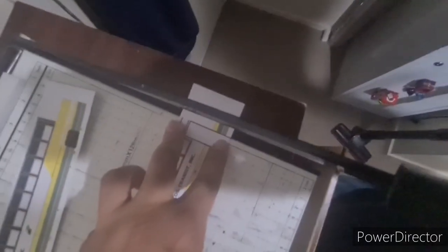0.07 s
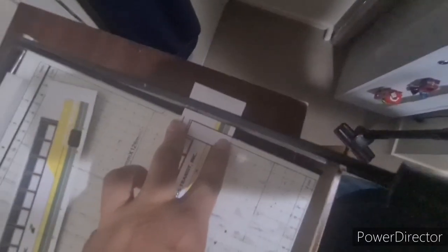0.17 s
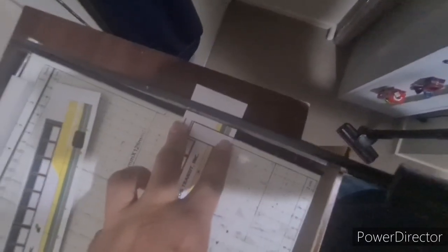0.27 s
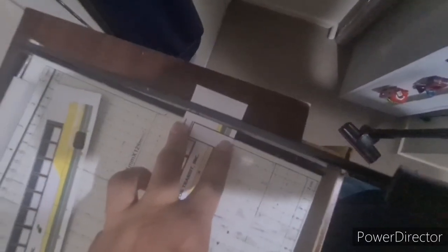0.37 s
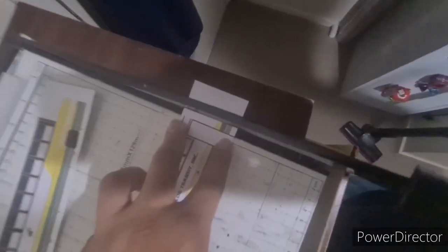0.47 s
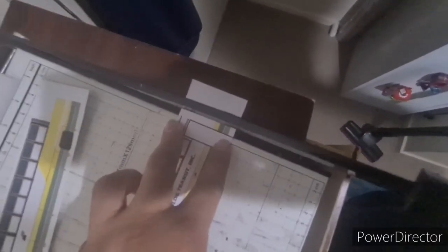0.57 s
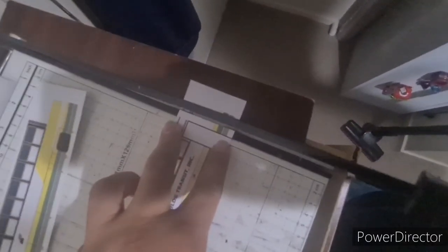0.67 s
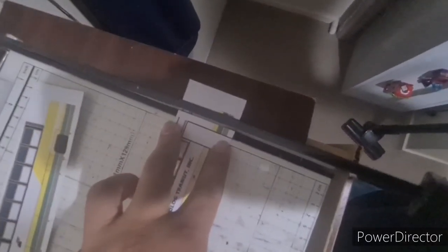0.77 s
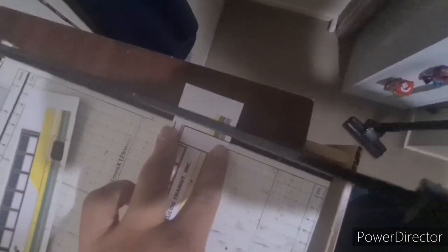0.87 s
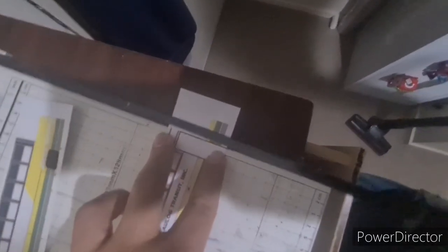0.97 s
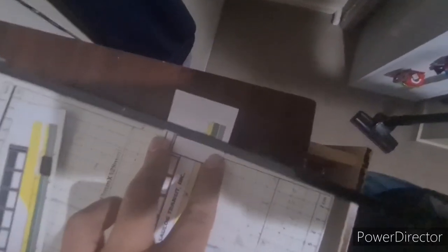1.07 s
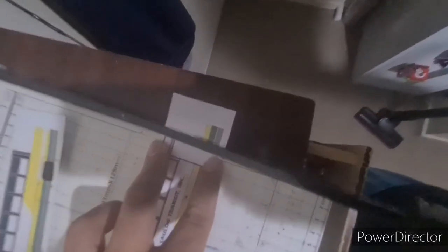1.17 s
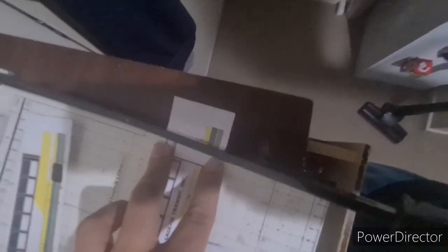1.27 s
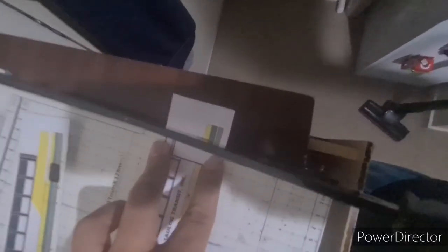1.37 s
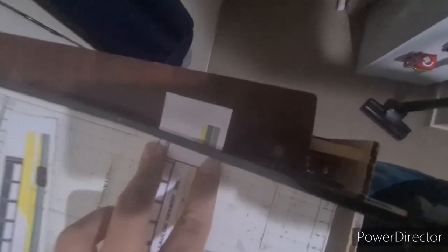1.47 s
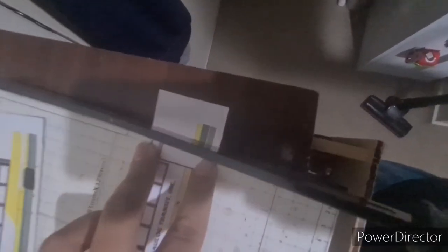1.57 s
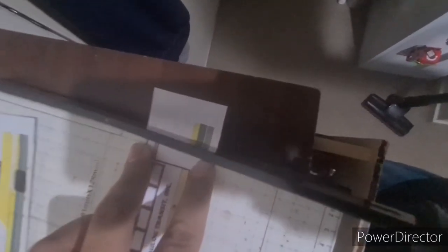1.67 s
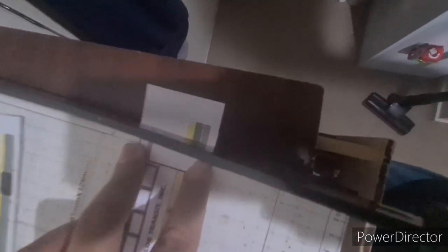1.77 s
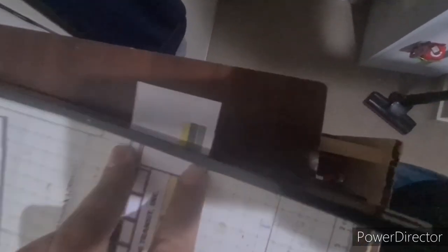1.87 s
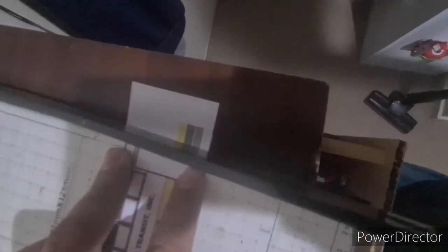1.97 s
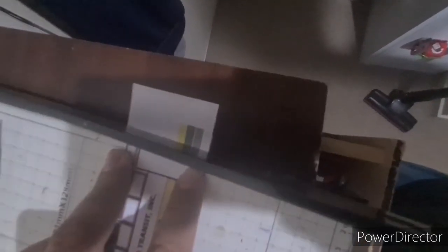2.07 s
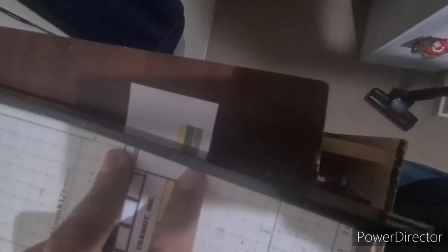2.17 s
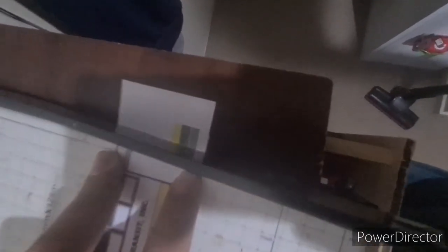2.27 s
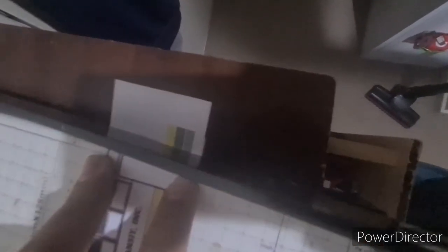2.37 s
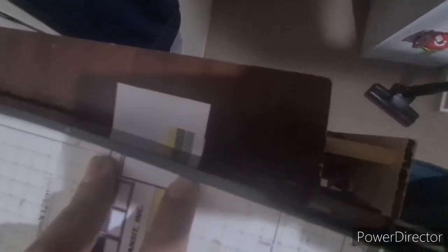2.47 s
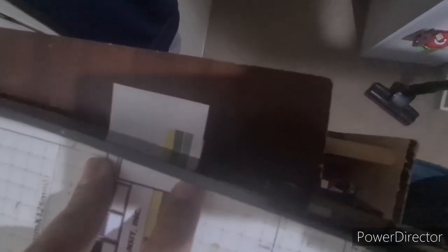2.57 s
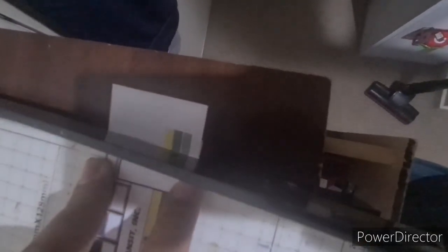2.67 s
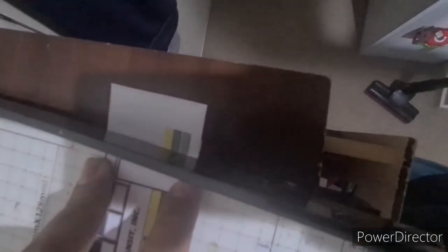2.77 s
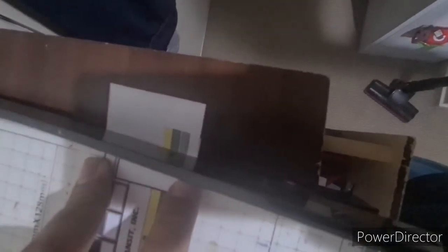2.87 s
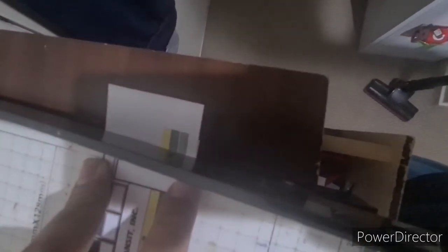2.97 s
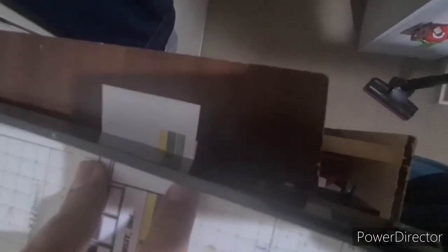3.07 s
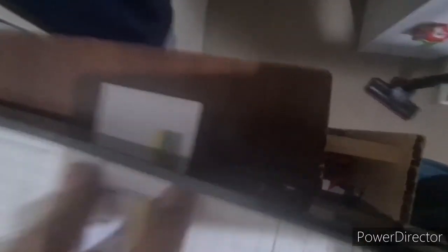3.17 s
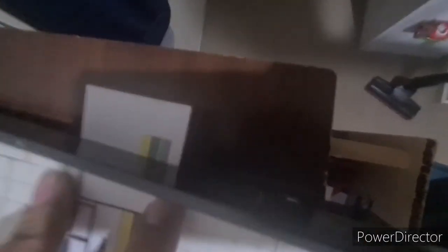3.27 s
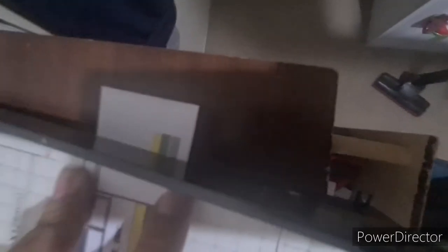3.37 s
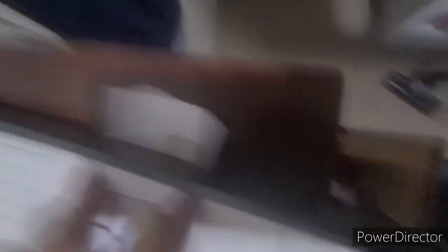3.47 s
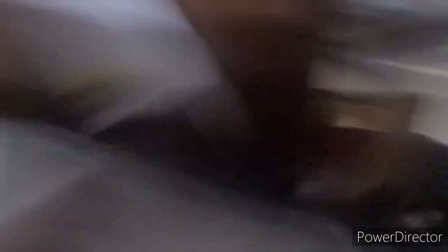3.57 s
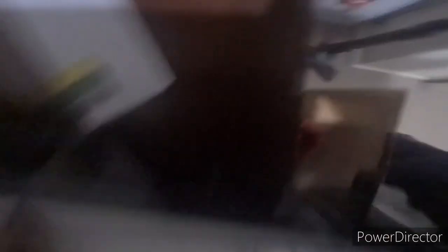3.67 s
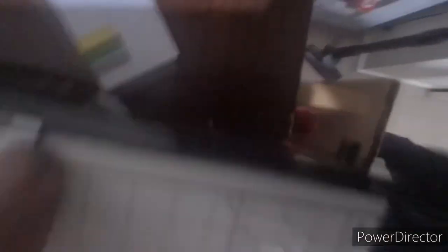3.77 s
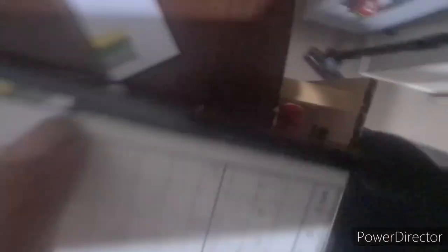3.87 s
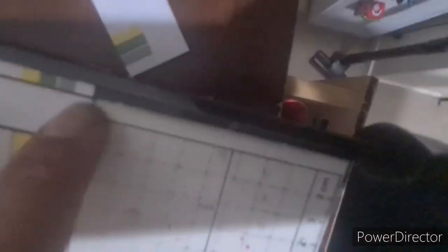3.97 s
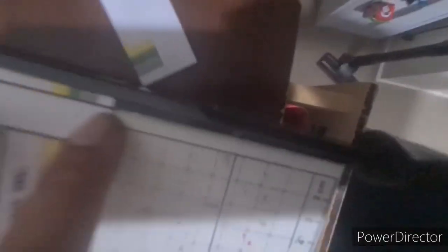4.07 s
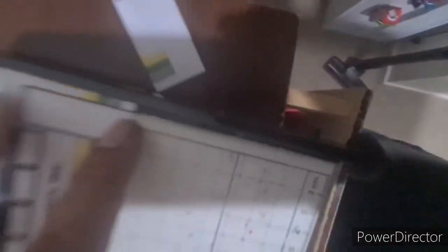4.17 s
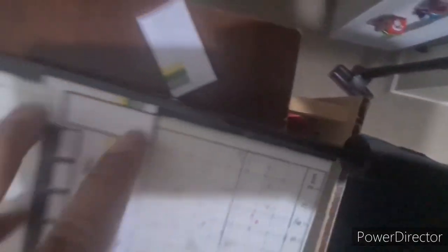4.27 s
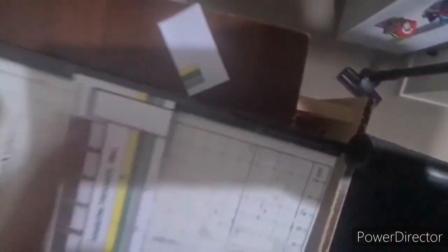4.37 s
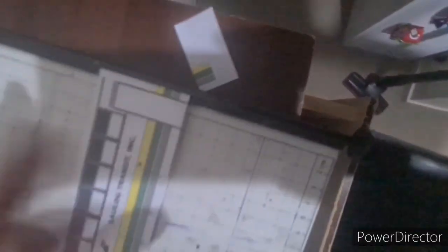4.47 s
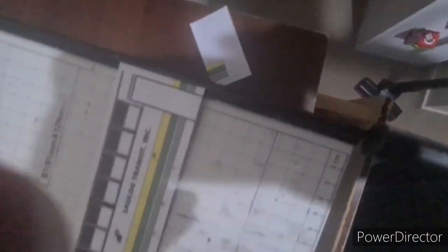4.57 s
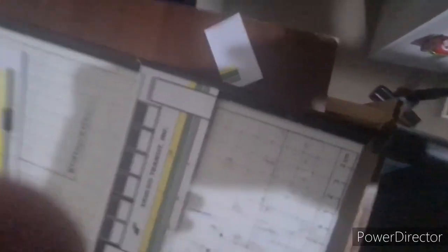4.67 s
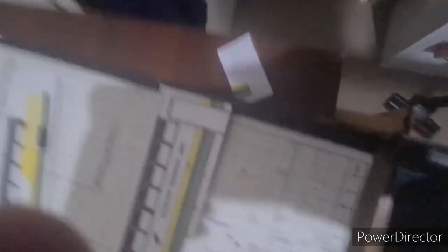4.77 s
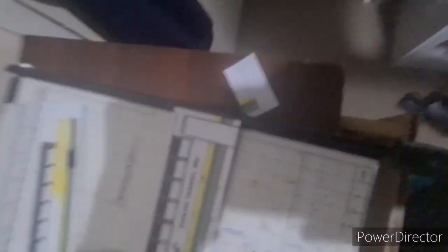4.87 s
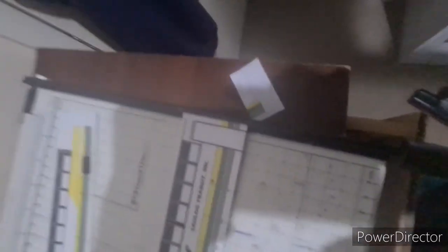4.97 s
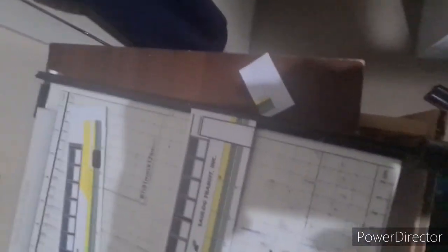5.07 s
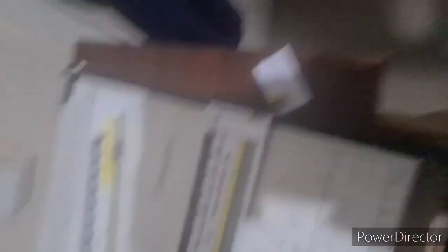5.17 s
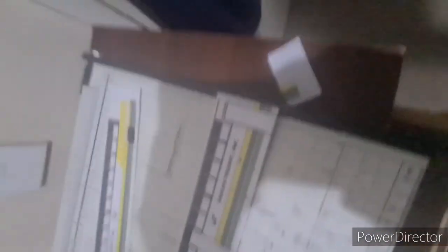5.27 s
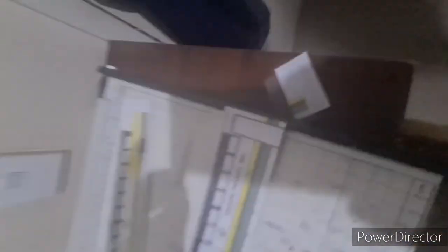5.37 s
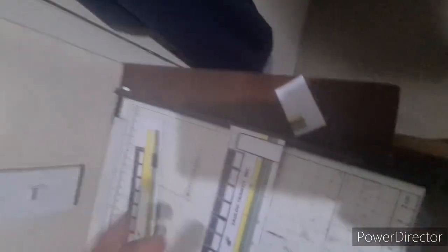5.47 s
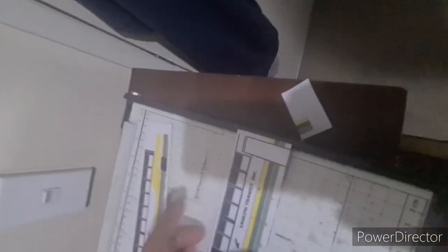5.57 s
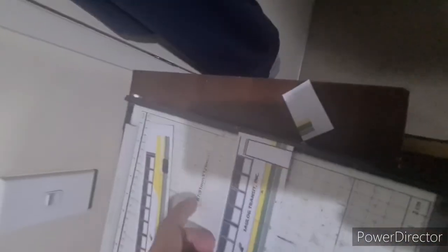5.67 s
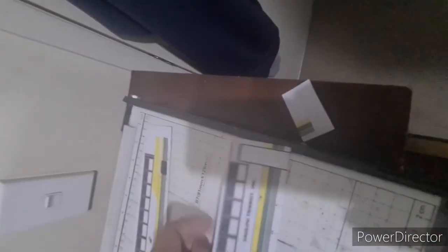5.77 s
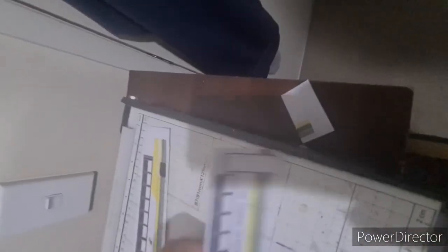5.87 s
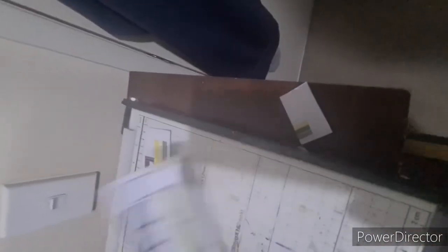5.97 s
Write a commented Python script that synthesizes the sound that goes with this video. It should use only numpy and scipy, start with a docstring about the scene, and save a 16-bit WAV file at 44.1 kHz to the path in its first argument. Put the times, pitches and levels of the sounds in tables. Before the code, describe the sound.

Faint metallic ticks and a thin blade whisper lead to a juddering card cut and hard steel clack, followed by light sliding, taps and board knocks.

```python
"""A guillotine paper cutter on a desk in a small room with a faint hum, heard from just above.
First the arm ticks on its pivot, its blade whispers down the steel edge and the pivot groans softly.
The blade then shears card by stick-slip in a bite, a push and a final chop, and steel clacks home and rings.
Last the card is slid aside with grainy rubs and taps, the board's modes answer knocks, and a sheet is picked up.
Impacts excite decaying modes; friction is shaped noise or clumps of tiny slips."""
import sys
import numpy as np
from scipy import signal
from scipy.fft import rfft, irfft
from scipy.io import wavfile
from scipy.ndimage import uniform_filter1d

SR = 44100
rng = np.random.default_rng(int(sys.argv[2]) if len(sys.argv) > 2 else 0)


def unload_audio(sound):
    """Save the sound as a 16-bit wav file, at the path given as the first command line argument."""
    columns = np.transpose(np.atleast_2d(sound))
    # keep every value between -1 and 1, then stretch to whole-number steps
    steps = np.round(np.clip(columns, -1, 1) * 32767)
    wavfile.write(sys.argv[1], SR, steps.astype(np.int16))


N = 265482
TIME = np.arange(N) / SR

# modes of the steel arm, lowest first: mode_hz, level_db, t60_s, left_right_db
ARM_MODES = [(501, 1, 0.14, 3), (2520, 3, 0.083, -9.5), (2970, -2.5, 0.064, 0.5), (3065, 0, 0.045, -8),
             (3580, -1, 0.09, 3), (4160, 2, .1, -2.5), (4260, -6, 0.084, 4.5), (5290, -6.5, 0.088, 10.5),
             (5500, -6.5, 0.053, 15), (6450, -10, 0.04, 9.5), (7300, -12.5, 0.04, 13),
             (11400, -11, 0.07, -9.5), (13300, -13, .05, -7)]
# steel meets steel: start_s, click_db, ring_db, left_right_db
STEEL_CLACKS = [(3.62, -16, -19, 5.5), (3.628, -33, -37, -18), (3.718, -65, -49, 0)]
# likeness of left and right: frequency_hz, correlation
CHANNEL_LIKENESS = [(60, .88), (150, .88), (300, .74), (640, .7), (1200, .52), (2200, -.1), (7000, 0)]


def amp(db):
    """Decibels become an amplitude ratio."""
    return 10 ** (np.asarray(db) / 20)


def evened(x):
    """Normalization to unit root-mean-square level."""
    return x / np.sqrt(np.mean(x ** 2) + 1e-20)


def attack_evened(x):
    """Normalization of a transient to unit level over its first 20 ms."""
    return x / x[:, :SR // 50].std()


def read(points, hz):
    """Interpolation along a logarithmic frequency axis."""
    point_hz, value = np.transpose(points)
    return np.interp(np.log(hz + 1), np.log(point_hz + 1), value)


def panned(left_right_db):
    """Interchannel level difference, shared equally between left and right."""
    return amp(np.array([[left_right_db], [-left_right_db]]) / 2)


def add(mix, start_s, sound):
    """Superposition of a sound from its starting time."""
    part = mix[:, round(start_s * SR):][:, :sound.shape[1]]
    part += sound[:, :part.shape[1]]


def through(x, response):
    """Convolution: a linear system answers every sample with its impulse response."""
    return signal.fftconvolve(np.atleast_2d(x), np.atleast_2d(response), axes=1)[:, :x.shape[-1]]


def decaying_noise(length, t60):
    """Dense modes dying together: noise with an exponential decay of 60 dB in t60 seconds."""
    t = np.arange(length) / SR
    return rng.standard_normal((2, length)) * np.exp(-np.log(1000) * t / t60)


def coloured(x, colour):
    """Minimum-phase filtering of two unrelated channels, mixed so that their bass is nearly alike."""
    log_gain = np.log(amp(read(colour, abs(np.fft.fftfreq(4096, 1 / SR)))))
    # the Hilbert transform of the log gain gives the phase of a causal filter
    taps = np.fft.ifft(np.exp(np.conj(signal.hilbert(log_gain)))).real
    a, b = rfft(x, 2 * x.shape[1])
    likeness = read(CHANNEL_LIKENESS, np.linspace(0, SR / 2, len(a)))
    turn = np.arccos(np.clip(likeness, -1, 1)) / 2
    left = a * np.cos(turn) + b * np.sin(turn)
    right = a * np.cos(turn) - b * np.sin(turn)
    pair = irfft([left, right])
    return through(pair[:, :x.shape[1]], taps[:len(taps) // 2])


def noise(colour):
    """Steady broadband turbulence: random noise with a given spectrum."""
    return evened(coloured(rng.standard_normal((2, N)), colour))


def whistle(hz, width_hz):
    """Narrow-band noise: one resonance selects a band, at half amplitude across width_hz."""
    f = np.fft.rfftfreq(N, 1 / SR)
    spectrum = rfft(rng.standard_normal((2, N)))
    return evened(irfft(spectrum / (1 + (2 * (f - hz) / width_hz) ** 2), N))


def grains(per_s, spread_db, clump_db):
    """Granular friction: tiny slips of uneven size at random times, coming in clumps."""
    size = amp(spread_db * np.minimum(rng.exponential(1, N), 4))
    slips = size * (rng.random(N) < per_s / SR)
    clumps = amp(clump_db * evened(uniform_filter1d(rng.standard_normal(N), size=260)))
    return evened(slips * clumps * rng.standard_normal((2, N)))


def stroke(start, length, db, attack_s, release_s, arch_db=0, crest=0.44):
    """Force envelope: attack, a hold that may arch to a crest, release (both times for 60 dB)."""
    along = np.clip((TIME - start) / length, 0, 1)
    before = np.maximum(start - TIME, 0) / attack_s
    after = np.maximum(TIME - start - length, 0) / release_s
    fade = np.exp(-np.log(1000) * np.minimum(before + after, 10))
    return amp(db - arch_db * (along - crest) ** 2) * fade


def strokes(rows, attack_s, release_s):
    """Superposition of the envelopes of several movements of one kind."""
    return sum(stroke(*row, attack_s, release_s) for row in rows)


def ringing(modes, rise_s):
    """Modal impulse response: decaying sines, of which the low modes take longest to build up."""
    t = np.arange(SR // 2) / SR
    out = 0
    for k, (hz, db, t60, side_db) in enumerate(modes):
        # rise_s belongs to the first mode of the table
        swell = 1 - np.exp(-t / (rise_s * np.sqrt(modes[0][0] / hz)))
        spread = np.arccos(np.clip(read(CHANNEL_LIKENESS, hz), -1, 1))
        apart = np.array([[.5], [-.5]]) * (-1) ** k * spread
        swing = np.sin(2 * np.pi * (hz * t + rng.random()) + apart)
        out = out + panned(side_db) * amp(db - 60 * t / t60) * swell * swing
    return attack_evened(out)


def cutter(contact_hz, low_hz):
    """Contact filtering of the board's modes: a soft contact spares the high, a light one the lowest."""
    # modes of the board: mode_hz, level_db, t60_s, left_right_db
    board_modes = [(145.9, -1, 0.1414, 0.5), (150.8, 7.5, 0.087, -1), (176, 8.5, 0.11, 4.5),
                   (307, -10, 0.15, 7.5), (367.6, -10.5, 0.096, -4), (449, -20, 0.038, 3),
                   (496.5, -3, 0.1016, 2), (587.3, -8, 0.2, 1.5), (740, -19.5, 0.053, -1.5),
                   (838, -8.5, 0.055, -6), (907, -11, 0.043, 18.5), (949, -11.5, 0.066, 8.5),
                   (1164, -0.5, 0.098, -0.5), (1211, -13.5, 0.21, 5.5), (1680, -10, 0.0468, 2.5),
                   (1635, -4, .09, -5.5), (1730, -12.5, 0.044, 0.5), (1996, -5, 0.0597, -12.5)]
    low_pass = signal.butter(2, min(contact_hz, SR / 3), fs=SR)
    high_pass = signal.butter(2, low_hz, "high", fs=SR)
    ring = signal.lfilter(*low_pass, ringing(board_modes, rise_s=0.0098))
    return attack_evened(signal.lfilter(*high_pass, ring))


def slipping(per_s, unevenness, relax, held):
    """Relaxation oscillation: the blade slips at an uneven rate, each burst dying to a held share."""
    wander = evened(uniform_filter1d(rng.standard_normal(N), size=200))
    turns = np.cumsum(per_s * np.exp(unevenness * wander)) / SR
    return evened(held + np.exp(-(turns % 1) / relax))


def shaken(force, soft_hz, low_hz):
    """Forced vibration: stick and slip shake the board's modes, whose swing follows the force."""
    body, slips = cutter(soft_hz, low_hz), rng.standard_normal(N)
    power = (through(slips, body) ** 2).mean(0)
    swing = np.sqrt(uniform_filter1d(power, size=800) + 1e-12)
    return through(slips * force, body) / swing


def shearing(steel_db=-21, echo_db=1, echo_t60=0.037):
    """Stick-slip fracture: fibres snap in bursts that rattle frame and arm while the board judders."""
    # bite, push and final chop; release_s is the tearing's:
    # start_s, length_s, judder_db, tear_db, contact_hz, low_cut_hz, release_s, attack_s
    pushes = [(3.032, 0.098, -39, -47.5, 457, 87, .12, 0.15), (3.182, 0.16, -27, -32, 729, 141.7, .06, 0.1),
              (3.564, 0.08, -25.5, -22.5, 1390, 260, 0.18, 0.095)]
    # spectrum of tearing: frequency_hz, level_db
    tear_colour = [(60, -23), (280, -6), (520, 16), (740, -12.5), (900, 2), (1150, -1), (1650, 4),
                   (1950, -1), (2300, -6), (3300, 0), (5000, -16), (6500, -16), (8200, -30), (11500, -17.5),
                   (15500, -34)]
    bursts = slipping(per_s=130, unevenness=.5, relax=.25, held=.25)
    snaps = bursts * grains(per_s=7000, spread_db=4, clump_db=1.5)
    frame = decaying_noise(SR // 10, echo_t60)
    rattle = through(snaps, frame / np.linalg.norm(frame[0]))
    fibres = evened(coloured(snaps + amp(echo_db) * rattle, tear_colour))
    # the arm's lowest mode stays out of the tearing
    steel = amp(steel_db) * evened(through(snaps[0], ringing(ARM_MODES[1:], rise_s=0.0022)))
    out = np.zeros((2, N))
    for start, length, judder_db, tear_db, contact_hz, low_hz, release_s, attack_s in pushes:
        tear = stroke(start, length, tear_db, attack_s, release_s, arch_db=24.5, crest=0.57)
        push = stroke(start, length, judder_db, attack_s, release_s=0.094)
        out += tear * (fibres + steel) * panned(0.4)
        out += shaken(push * bursts, contact_hz, low_hz)
    return out


def strikes(rows, colour, t60, spike, steel_db, low_hz, contact_hz):
    """Impact excitation: a spike and fast-dying clatter, then arm and board, duller for softer blows."""
    # a harder blow makes a shorter contact, which reaches higher modes
    harder_db_per_octave = 33.5
    out = np.zeros((2, N))
    hardest_db = max(row[1] for row in rows)
    for start_s, click_db, ring_db, side_db in rows:
        clatter = decaying_noise(SR // 2, t60)
        clatter[0, 0] += spike
        click = attack_evened(coloured(clatter, colour))
        click = click + amp(steel_db) * ringing(ARM_MODES, rise_s=.001)
        octaves = (click_db - hardest_db) / harder_db_per_octave
        board = cutter(contact_hz * 2 ** octaves, low_hz)
        add(out, start_s, panned(side_db) * amp(click_db) * click + amp(ring_db) * board)
    return out


def card_crack():
    """Brittle fracture: the card cracks sharply as the blade bites."""
    # start_s, click_db, ring_db, left_right_db
    cracks = [(3.2435, -30, -50, 7.5)]
    # spectrum of the crack: frequency_hz, level_db
    crack_colour = [(200, -57), (1500, 9.5), (3000, 3.5), (5000, 11.5), (6800, 6), (8200, -21),
                    (12000, -6.5), (15500, -41)]
    return strikes(cracks, crack_colour, t60=0.043, spike=11, steel_db=-24.5, low_hz=150, contact_hz=2980)


def steel_clacks():
    """Impact and free vibration: steel meets steel, then the freed blade and arm sing on."""
    # spectrum of the clack: frequency_hz, level_db
    clack_colour = [(60, 9.5), (300, -3), (1000, 4), (1800, 0), (2500, -9.5), (3800, -7), (5000, -11),
                    (6500, -4.5), (8200, -27.5), (10200, -11), (13000, -17.5), (15500, -32)]
    # modes of the freed blade: mode_hz, level_db, t60_s, left_right_db
    blade_modes = [(3400, -9, .36, 0), (3605, -5, .46, 0), (4112, -1, .31, 0), (4950, -10, .3, 0)]
    out = strikes(STEEL_CLACKS, clack_colour, t60=0.084, spike=1.2, steel_db=-13.5,
                  low_hz=200, contact_hz=2000)
    first_s = STEEL_CLACKS[0][0]
    add(out, first_s, amp(-39.0) * ringing(blade_modes, rise_s=0.0022))
    add(out, first_s, amp(-24) * ringing(ARM_MODES[:1], rise_s=0.0031))
    return out


def thuds(side_db=2):
    """Heavily damped vibration: the desk gives under heavier blows, swings a few cycles and is still."""
    # start_s, level_db, swing_hz, rise_s (time to the peak)
    desk_blows = [(2.409, -38, 156.4, 0.019), (3.179, -30, 136, 0.02), (3.55, -23, 171, 0.0081),
                  (3.568, -16, 162, 0.0088), (3.623, -17, 148, 0.018), (3.709, -39, 164, 0.01),
                  (4.885, -41, 290, .005), (5.331, -37.5, 210, 0.0042), (5.68, -24.5, 172.8, 0.012),
                  (5.802, -28.5, 177.4, 0.0079)]
    t, out = np.arange(SR // 6) / SR, np.zeros((2, N))
    for start_s, db, hz, rise_s in desk_blows:
        swell = (t / rise_s * np.exp(1 - t / rise_s)) ** 3
        swing = np.sqrt(2) * np.sin(2 * np.pi * hz * t)
        add(out, start_s, panned(side_db) * amp(db) * swell * swing)
    return out


def gliding():
    """Sliding friction: steel whispers on steel, its resonances catching and letting go, one singing."""
    # start_s, length_s, whisper_db, singing_db, singing_hz
    glides = [(.19, 0.69, -65.5, -67, 4140), (1.228, 0.29, -69.5, -76, 4100), (1.416, 0.18, -79, -71, 4200),
              (2.69, 0.16, -63.5, -62, 4070), (2.918, 0.22, -60, -63, 4080)]
    # resonances of the whisper: centre_hz, width_hz, level_db
    edge_resonances = [(3800, 1100, -7), (4250, 600, -3.5), (4580, 380, -.5), (5400, 700, -11),
                       (7600, 500, -20), (9850, 800, -16), (11300, 1000, -13), (13500, 2400, -20)]

    def catching():
        """Slow random modulation, drawn afresh for each resonance."""
        return evened(amp(2.6 * evened(uniform_filter1d(rng.standard_normal(N), size=500))))

    whisper = evened(sum(amp(db) * whistle(hz, width) * catching() for hz, width, db in edge_resonances))
    out = 0
    for start, length, whisper_db, singing_db, hz in glides:
        singing = whistle(hz, width_hz=92) * catching()
        glide = stroke(start, length, 0, attack_s=0.24, release_s=0.27, arch_db=10, crest=0.32)
        out += glide * (amp(whisper_db) * whisper + amp(singing_db) * singing)
    return out * panned(0.14)


def pivot_ticks():
    """Impact excitation: the pivot ticks and sets the arm's lowest mode ringing."""
    # start_s, click_db, ring_db, left_right_db
    ticks = [(0.1266, -45, -50, -6), (0.2713, -46, -49.5, -5), (0.3987, -41.5, -67, -4.5),
             (1.3773, -39, -43.5, -4), (2.2285, -48.5, -41.5, -4), (2.5709, -57.5, -47, -2)]
    # spectrum of the tick: frequency_hz, level_db
    tick_colour = [(200, -6.5), (700, -5), (1000, 6), (2000, -4.5), (2850, 3), (4200, 0), (5200, -8),
                   (6800, -12), (8100, -27), (9500, -14), (13000, -8.5), (15500, -26)]
    out = strikes(ticks, tick_colour, t60=0.066, spike=2.2, steel_db=-10.5, low_hz=95, contact_hz=2340)
    for start_s, _, ring_db, _ in ticks:
        add(out, start_s, amp(ring_db - 10) * ringing(ARM_MODES[:1], rise_s=0.011))
    return out


def pivot_groan():
    """Self-sustained vibration: friction in the turning pivot keeps the arm's lowest mode sounding."""
    # start_s, length_s, level_db
    groans = [(1.76, 0.29, -57.5), (2.25, 0.18, -55)]
    return strokes(groans, attack_s=0.18, release_s=0.21) * whistle(ARM_MODES[0][0], width_hz=30)[0]


def fittings_clink():
    """Free vibration: the fittings clink once, lightly."""
    # modes of the fittings: mode_hz, level_db, t60_s, left_right_db
    fitting_modes = [(2950, 2, 0.18, -5), (3420, -6, .1, -2), (4340, -1.5, 0.07, -2)]
    out = np.zeros((2, N))
    add(out, 2.287, amp(-52.5) * ringing(fitting_modes, rise_s=0.00032))
    return out


def leaning():
    """Forced vibration: the hand leans on the board, which grumbles."""
    # start_s, length_s, level_db
    leans = [(1.52, 0.42, -52), (2.3, 0.32, -76), (2.65, 0.43, -58.5), (6.0, .02, -45)]
    return shaken(strokes(leans, attack_s=0.29, release_s=0.52), soft_hz=754, low_hz=147)


def sliding():
    """Sliding friction: at each shove the card's face rubs dully and its edge hisses in bright grains."""
    # start_s, length_s, rub_db, hiss_db
    shoves = [(4.802, 0.056, -54.5, -58), (4.876, 0.052, -60, -55), (4.95, 0.046, -56.5, -53.5),
              (5.006, 0.039, -54.5, -59.5), (5.12, 0.031, -58.5, -58), (5.212, 0.064, -52, -61.5),
              (5.299, 0.041, -53.5, -56.5), (5.379, 0.022, -58, -57.5), (5.793, 0.13, -49, -57)]
    # spectra of rub and hiss: frequency_hz, level_db
    rub_colour = [(100, -1), (380, 14.5), (650, 5.5), (1000, 6.5), (2000, -2.5), (3200, -3.5), (5000, -25),
                  (7000, -29), (15500, -31)]
    hiss_colour = [(300, -24.5), (2000, -10), (2850, 10), (3600, 4), (4700, 0.5), (5600, -4), (6900, -25),
                   (7600, -19), (8400, -25), (9800, -22), (15500, -37)]
    rub = evened(coloured(grains(per_s=3000, spread_db=2.0, clump_db=1.5), rub_colour))
    hiss = evened(coloured(grains(per_s=12000, spread_db=2, clump_db=2.5), hiss_colour))
    out = 0
    for start, length, rub_db, hiss_db in shoves:
        shove = stroke(start, length, 0, attack_s=.15, release_s=.16, arch_db=14)
        out += shove * (amp(rub_db) * rub + amp(hiss_db) * hiss)
    return out * panned(5.8)


def card_taps():
    """Light impact: card edges tap and snap, with a soft answer from the board."""
    # start_s, click_db, ring_db, left_right_db
    taps = [(4.692, -60, -71, 26), (4.7435, -59, -61, 17), (4.754, -58, -61, 24.5), (4.8255, -50, -63, 2),
            (4.886, -45, -58, -8), (5.022, -75, -51, 4), (5.038, -54, -68, 8), (5.1805, -46.5, -51, -3),
            (5.194, -62, -51, 2), (5.3315, -46.5, -59, 7.5), (5.338, -46, -63, 1.5), (5.366, -53, -72, 13),
            (5.395, -56.5, -55, 26.5), (5.419, -56, -67, 4)]
    # spectrum of the tap: frequency_hz, level_db
    tap_colour = [(50, 8.5), (230, 25.5), (700, 15), (1600, 15), (3000, 10.5), (5000, -6.5), (7000, -31.5),
                  (15000, -28)]
    return strikes(taps, tap_colour, t60=0.025, spike=6, steel_db=-30, low_hz=260, contact_hz=1160)


def board_knocks():
    """Impact excitation: knocks and the rattles that follow them ring the board."""
    # start_s, click_db, ring_db, left_right_db
    knocks = [(2.412, -88, -55, 0), (2.592, -74, -46.5, 0), (4.388, -58.5, -49.5, 9),
              (5.6775, -36, -35.5, -3), (5.686, -32, -33.5, -4), (5.724, -47, -36.5, 0),
              (5.7955, -36.5, -43.5, -2), (5.804, -69, -36.5, -3), (5.839, -49, -51, -10),
              (5.877, -48.5, -46, -13)]
    # spectrum of the knock: frequency_hz, level_db
    knock_colour = [(100, -22), (310, 4.5), (520, 13), (880, -1), (1150, -3), (2000, -15), (3700, -5),
                    (5500, -25), (8200, -37.5), (10500, -33), (15500, -34.5)]
    return strikes(knocks, knock_colour, t60=0.11, spike=4, steel_db=-16, low_hz=330, contact_hz=1100)


def sheet_lift():
    """Granular friction: a sheet is dragged up off the board."""
    # start_s, length_s, level_db
    lifts = [(5.959, 0.027, -39.5), (5.996, 0.0098, -33.5), (6.011, 0.0046, -56)]
    # spectrum of the drag: frequency_hz, level_db
    lift_colour = [(150, -6), (500, 3), (1000, -3.5), (1450, 6.5), (2500, 1), (4000, -9.5), (6000, -17),
                   (8200, -28), (10000, -23.5), (15500, -29)]
    drag = evened(coloured(grains(per_s=9200, spread_db=2, clump_db=-0.5), lift_colour))
    return strokes(lifts, attack_s=0.044, release_s=0.035) * drag


def finger_brush():
    """Light friction: fingers brushing the card make short puffs of bright noise."""
    # start_s, length_s, level_db
    brushes = [(2.58, 0.026, -73), (4.349, .003, -67), (4.36, 0.058, -72), (4.95, 0.029, -73)]
    # spectrum of the brush: frequency_hz, level_db
    brush_colour = [(1000, -11), (4000, 1), (6000, -1.5), (8100, -16), (9800, -0.5), (13000, -3),
                    (15500, -5)]
    return strokes(brushes, attack_s=0.054, release_s=0.13) * noise(brush_colour)


def low_bumps():
    """Low-frequency disturbance: short bumps of deep noise."""
    # start_s, length_s, level_db
    bumps = [(2.74, 0.043, -39.5), (3.0, 0.037, -42), (3.2, 0.12, -41), (3.625, 0.028, -32),
             (4.685, 0.014, -49.5)]
    # spectrum of the bump: frequency_hz, level_db
    bump_colour = [(10, -10.5), (30, 0), (70, 4), (110, 1), (250, -6), (800, -46), (3000, -82.5)]
    return strokes(bumps, attack_s=0.14, release_s=0.25) * noise(bump_colour) * panned(-2.12)


def room_air():
    """Stationary noise: soft room air, which dips at the first clack and slowly comes back."""
    # spectrum of the air: frequency_hz, level_db
    air_colour = [(15, -23), (32, -7.5), (70, -4), (120, -4), (180, 1.5), (280, -9.5), (450, -13),
                  (700, -14), (1200, -17), (2200, -20), (4000, -27), (5400, -39.5), (6600, -56.5),
                  (11000, -55), (16000, -64)]
    air_db, dip_db, recovery_s = -50.5, 4, 5
    since = TIME - STEEL_CLACKS[0][0]
    dip = dip_db * (since > 0) * np.exp(-abs(since) / recovery_s)
    return amp(air_db - dip) * noise(air_colour) * panned(.3)


def hum():
    """Narrow-band noise: a low hum wavers because its band has some width."""
    return amp(-62.5) * whistle(185.8, width_hz=13)[0]


def room(x, wet_db, t60, dull_hz):
    """Reverberation: desk and near walls return a short, dull, exponentially dying tail."""
    length = SR // 3
    tail = decaying_noise(length, t60) * (np.arange(length) / SR > .005)
    tail = signal.lfilter(*signal.butter(2, min(dull_hz, SR / 3), fs=SR), tail)
    return x + amp(wet_db) * through(x, tail / np.linalg.norm(tail[0]))


def scene():
    """Superposition: the near sources share the room's tail, and the background lies beneath."""
    cutting = shearing() + card_crack() + steel_clacks() + thuds()
    arm = gliding() + pivot_ticks() + pivot_groan() + fittings_clink()
    handling = leaning() + sliding() + card_taps() + board_knocks() + sheet_lift() + finger_brush()
    near = cutting + arm + handling + low_bumps()
    return room(near, wet_db=-20.5, t60=0.16, dull_hz=3130) + room_air() + hum()


def record(dry):
    """Soft saturation rounds off the very highest peaks; a low-pass then limits the band."""
    top_hz = 15900
    rounded = dry / (1 + (dry / .9) ** 6) ** (1 / 6)
    low_pass = signal.firwin(401, top_hz, window=("kaiser", 9), fs=SR)
    return signal.oaconvolve(rounded, low_pass[None], "same")


dry = scene()
out = record(dry)
unload_audio(out)
```